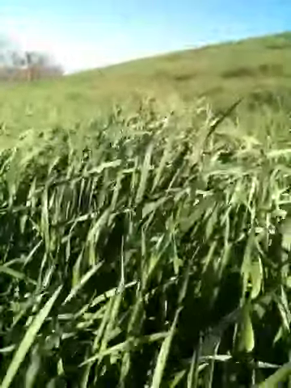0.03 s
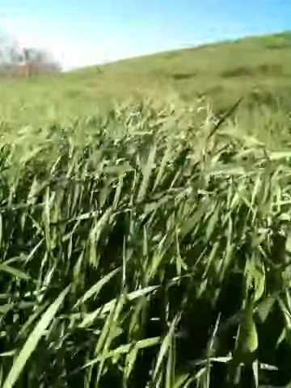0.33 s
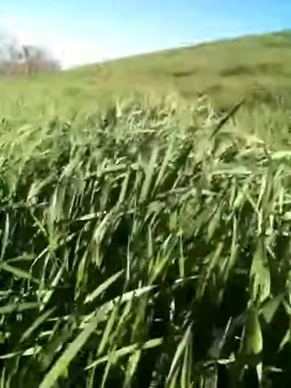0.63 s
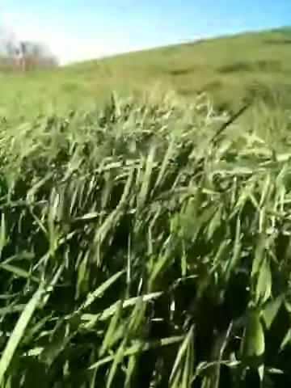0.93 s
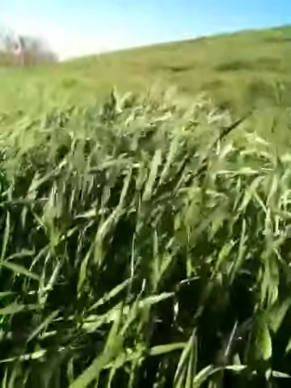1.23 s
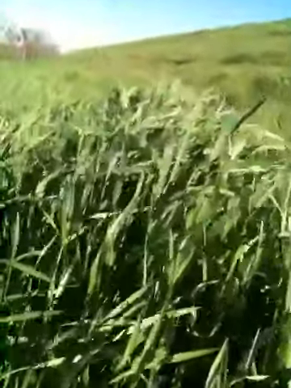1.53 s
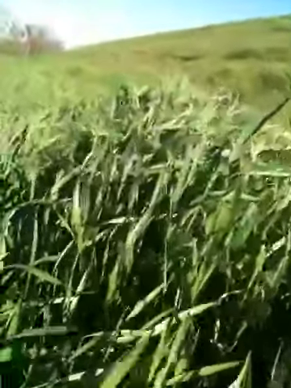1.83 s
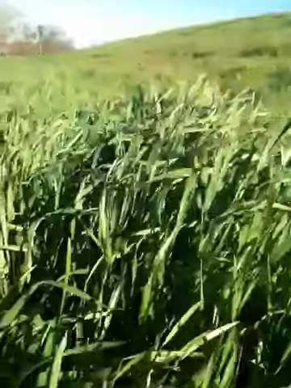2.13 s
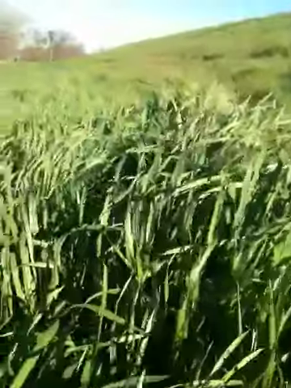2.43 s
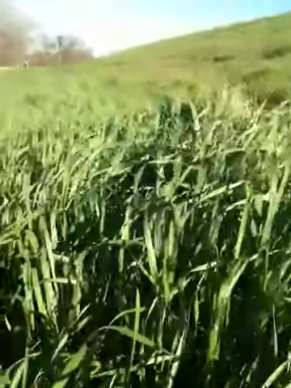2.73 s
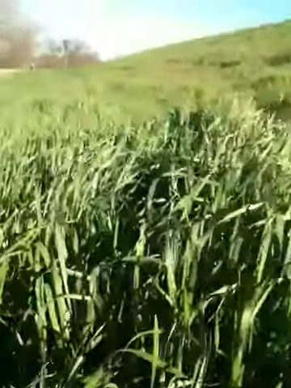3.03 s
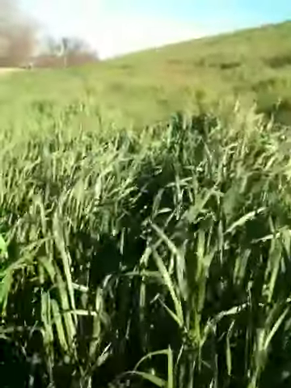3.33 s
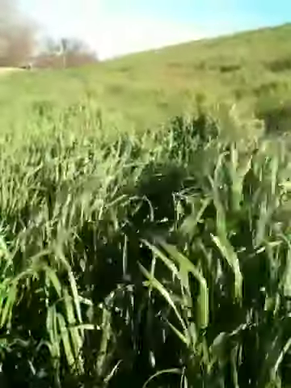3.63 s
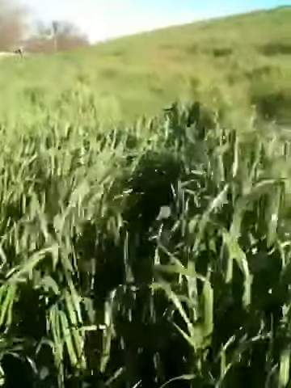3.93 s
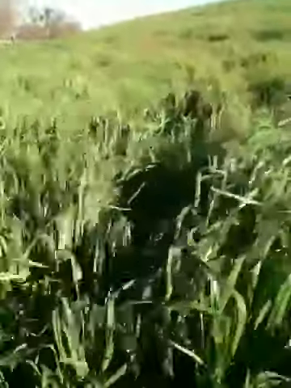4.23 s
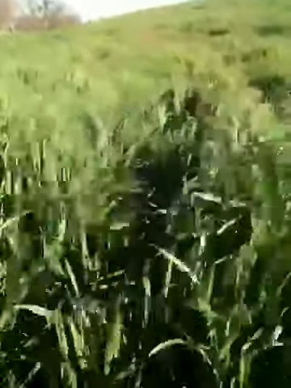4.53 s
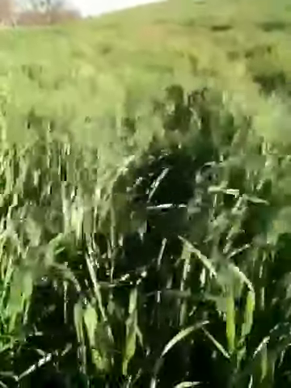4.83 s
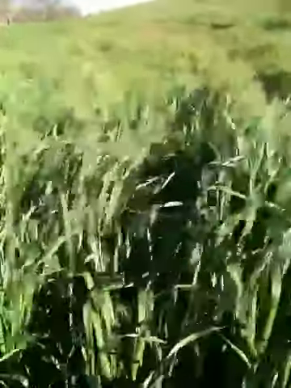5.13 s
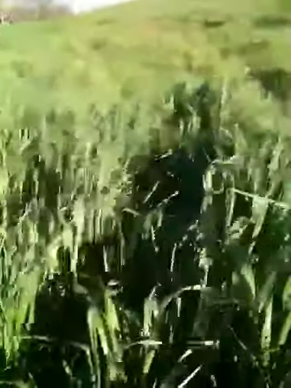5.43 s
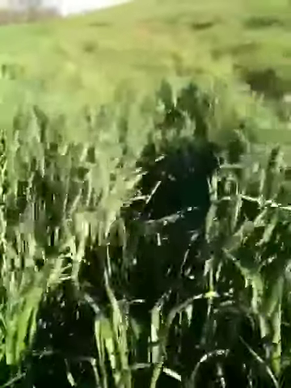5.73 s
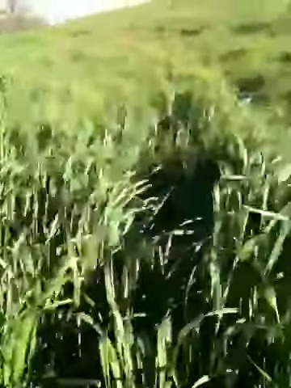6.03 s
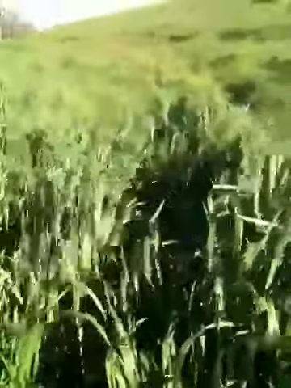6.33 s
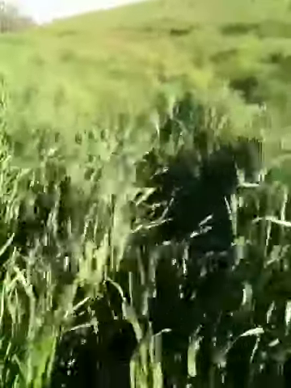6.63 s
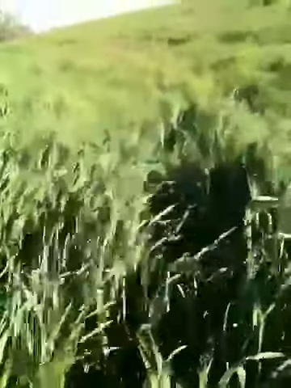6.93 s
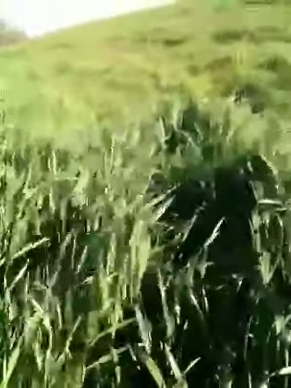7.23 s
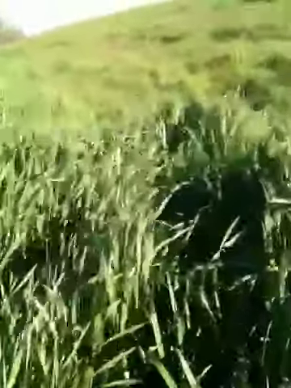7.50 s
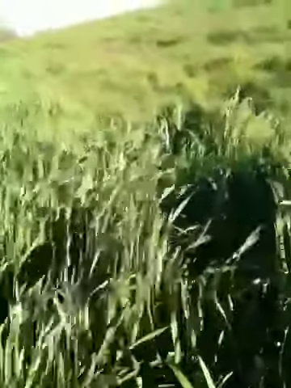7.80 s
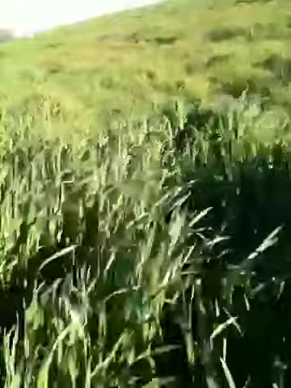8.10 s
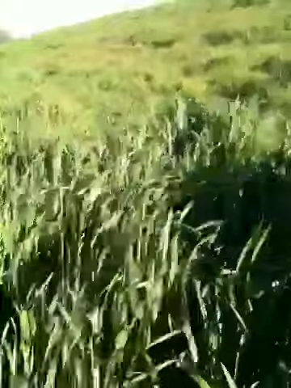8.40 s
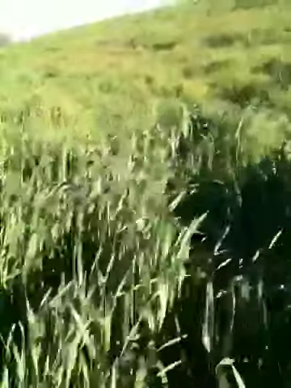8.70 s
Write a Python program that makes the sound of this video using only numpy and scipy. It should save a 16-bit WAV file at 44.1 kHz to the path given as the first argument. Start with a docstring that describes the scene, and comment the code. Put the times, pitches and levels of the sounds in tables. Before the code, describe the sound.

A quiet breeze rustles tall grass close to the microphone, with small, bright flicks of blades and a soft rush of wind far across the hill. Then wind starts hitting the microphone in uneven, low rumbles, much louder than the grass. After a single, barely audible peep, the buffeting peaks with thumps and brief pops and carries on to the end.

```python
"""Wind on an open hillside, from a small microphone held just above tall grass.
At first the blades hiss and tick as the breeze swells, over a soft, far roar of moving air.
From four seconds on, gusts reach the microphone and buffet it with low, fluttering thumps.
Just after seven seconds comes one faint peep; then the strongest gusts snap past the port."""
import sys
import numpy as np
from scipy import signal
from scipy.fft import rfft, irfft, next_fast_len
from scipy.io import wavfile
from scipy.ndimage import uniform_filter1d

SR = 44100
rng = np.random.default_rng(int(sys.argv[2]) if len(sys.argv) > 2 else 0)


def wrap_up_sound(samples):
    """Save the sound to the file named by the first command line argument, as 16-bit audio."""
    columns = np.atleast_2d(samples).T
    # keep every value between -1 and 1, then stretch to whole-number steps
    tamed = np.clip(columns, -1, 1)
    steps = np.round(tamed * 32767).astype(np.int16)
    wavfile.write(sys.argv[1], SR, steps)


N = 390726
TIME = np.arange(N) / SR


def gain_of(db):
    """Decibels to amplitude."""
    return 10 ** (np.asarray(db) / 20)


def unit_rms(x):
    """Scales to rms 1."""
    return x / np.sqrt(np.mean(x ** 2) + 1e-20)


def spectrum_gain(spectrum, hz):
    """A spectrum's amplitude at hz, its points joined on a log axis."""
    f, db = np.transpose(spectrum)
    return gain_of(np.interp(np.log(hz + 1), np.log(f + 1), db))


def follow(curve):
    """A curve's value at every sample."""
    return np.interp(TIME, *np.transpose(curve))


def add_centred(mix, s, sound):
    """Mixes a sound in, centred on the time s where there is room before it."""
    part = mix[max(round(s * SR) - len(sound) // 2, 0):][:len(sound)]
    part += sound[:len(part)]


def eddy_gain(hz, rolloff_hz):
    """The smallest eddies set a frequency above which the pressure dies away steeply."""
    return 1 / np.sqrt(1 + (hz / rolloff_hz) ** 6)


def coloured(x, spectrum, rolloff_hz=np.inf):
    """Gives x a spectrum, with an optional steep roll-off; rms 1."""
    size = next_fast_len(len(x))
    hz = np.fft.rfftfreq(size, 1 / SR)
    shaped = rfft(x, size) * spectrum_gain(spectrum, hz) * eddy_gain(hz, rolloff_hz)
    return unit_rms(irfft(shaped, size)[:len(x)])


def wander(rate_hz):
    """A random drift of rms 1, with motion up to about rate_hz."""
    size = next_fast_len(N)
    hz = np.fft.rfftfreq(size, 1 / SR)
    slow = rfft(rng.standard_normal(size)) / (1 + (hz / rate_hz) ** 4)
    return unit_rms(irfft(slow, size)[:N])


def impulses(per_s, spread_db):
    """A random train of tiny impulses, a few much stronger than the rest."""
    strength = gain_of(spread_db * np.minimum(rng.exponential(1, N), 5))
    return unit_rms(strength * rng.choice([-1., 1.], N) * (rng.random(N) < per_s / SR))


def whine(lines_hz=(14970, 15030), level_db=-87.5):
    """A very faint electrical whine behind everything: two close, high lines."""
    return gain_of(level_db) * sum(np.sin(2 * np.pi * hz * TIME) for hz in lines_hz)


# the distant roar's course: t/s, level/dB
ROAR_LEVEL = [(0, -60.5), (2.5, -59), (6, -59.5), (8.86, -59)]
# spectra of the roar and the rumble under it: f/Hz, relative level/dB
ROAR_SPECTRUM = [(100, -43), (330, -10.5), (480, -1.5), (620, -0.5), (780, -1), (1000, -5.5), (1300, -10.5),
                 (1800, -16.5), (2500, -27), (5000, -45)]
RUMBLE_SPECTRUM = [(20, -36), (40, -50), (62, -20), (90, -9.5), (125, 0.5), (160, 2.5), (225, -0.5),
                   (300, -10), (420, -18), (900, -50)]

def far_air(rumble_db=-57.0):
    """Far off, wind roars softly over the whole hill, above a steady low rumble."""
    roar = coloured(rng.standard_normal(N), ROAR_SPECTRUM)
    roar *= gain_of(follow(ROAR_LEVEL) + 0.23 * wander(rate_hz=4.7))
    rumble = coloured(rng.standard_normal(N), RUMBLE_SPECTRUM)
    rumble *= gain_of(rumble_db + 0.6 * wander(rate_hz=6.7))
    return roar + rumble


def peep(at_s=7.144, pitch_hz=3230, level_db=-57.5, length_s=0.016):
    """One thin, slightly unsteady note among the grass."""
    turns = np.cumsum(pitch_hz * (1 + 0.008 * wander(rate_hz=120))) / SR
    envelope = np.exp(-2 * ((TIME - at_s) / length_s) ** 2)
    return gain_of(level_db) * envelope * np.sin(2 * np.pi * turns)


def tufts(x, depth_db):
    """As different tufts move, patches a few hundred Hz wide swell and fade."""
    z = signal.stft(x, nperseg=512, noverlap=384)[2]
    patches = uniform_filter1d(rng.standard_normal(z.shape), size=9, axis=0)
    patches = unit_rms(uniform_filter1d(patches, size=26, axis=1))
    return unit_rms(signal.istft(z * gain_of(depth_db * patches), nperseg=512, noverlap=384)[1][:N])


# the breeze in the grass around the microphone: t/s, rustle level/dB
BREEZE_LEVEL = [(0.06, -66.5), (1.45, -64), (2.65, -60), (3.69, -61.5), (3.84, -60.5), (3.96, -61.5),
                (4.11, -58.5), (4.4, -59.5), (4.45, -58), (4.6, -61), (5.65, -63), (5.79, -61.5),
                (7.04, -61.5), (7.33, -58.5), (7.72, -61), (8.6, -61), (8.77, -63.5), (8.82, -62)]
# spectra of the far blades and the near tips: f/Hz, relative level/dB
HISS_SPECTRUM = [(1200, -12), (2000, -5), (2450, -5), (2950, 0), (3400, 1.5), (4050, 1), (4550, 2.5),
                 (5300, -1), (6000, -5.5), (6900, -8.5), (8000, -11.5), (11000, -22), (15700, -14.5)]
FIZZ_SPECTRUM = [(3500, -22.5), (5500, -4.5), (6600, -0.5), (7600, -1.5), (8800, 2), (10000, -1.5),
                 (11200, -5), (13000, -10.5), (15700, -13)]

def grass(usual_breeze_db=-62, hiss_db=-63.5, fizz_db=-66):
    """Far blades merge into a hiss; near tips add a grainy fizz that grows faster with the breeze."""
    swell_db = follow(BREEZE_LEVEL) - usual_breeze_db
    hiss = rng.standard_normal(N) + 0.5 * impulses(per_s=1800, spread_db=4.0)
    fizz = rng.standard_normal(N) + 0.61 * impulses(per_s=1300, spread_db=3.0)
    hiss = tufts(coloured(hiss, HISS_SPECTRUM), depth_db=0.52)
    hiss *= gain_of(hiss_db + 0.95 * swell_db + 0.47 * wander(rate_hz=21))
    fizz = tufts(coloured(fizz, FIZZ_SPECTRUM), depth_db=0.9)
    fizz *= gain_of(fizz_db + 1.63 * swell_db + 0.53 * wander(rate_hz=17))
    return hiss + fizz


def reflection(x, notch_hz=4180, slide_hz_per_s=103, width_hz=190, shoulder_hz=1300, settle_s=1.8):
    """A reflection cuts a notch with raised shoulders; it sinks and eases as the microphone turns."""
    first_db, later_db, shoulder_db = 5, 2.3, 2.0
    hz, t, z = signal.stft(x, SR, nperseg=1024)
    offset_hz = hz[:, None] - (notch_hz - slide_hz_per_s * t)
    fading = np.exp(-t / settle_s)
    dip_db = (later_db + (first_db - later_db) * fading) * np.exp(-(offset_hz / width_hz) ** 2)
    lift_db = shoulder_db * fading * np.exp(-(offset_hz / shoulder_hz) ** 2)
    return signal.istft(z * gain_of(lift_db - dip_db), nperseg=1024)[1][:N]


# blades sliding along each other: t/s, level/dB, length/s, centre f/Hz
BLADE_SWISHES = [(.8, -73, 0.064, 10050), (2.032, -75, 0.11, 10050), (2.386, -67, .12, 9800),
                 (7.73, -68, 0.11, 9900)]

def swishes(width_hz=450):
    """A long stroke of leaf on leaf: a narrow, grainy band that swells and fades."""
    out, t = np.zeros(N), np.arange(-8192, 8192) / SR
    skirt = [(-2.5, -40), (-1, -6), (0, 0), (1, -6), (2.5, -40)]  # offset/widths, level/dB
    for s, db, length, hz in BLADE_SWISHES:
        band = [(hz + offset * width_hz, band_db) for offset, band_db in skirt]
        stroke = coloured(impulses(per_s=2300, spread_db=4.0)[:len(t)], band)
        add_centred(out, s, gain_of(db) * stroke * np.exp(-2 * (t / length) ** 2))
    return out


# blades flicking close to the microphone: t/s, peak level/dB
BLADE_FLICKS = [(0.0667, -56), (.438, -57), (1.0071, -50), (1.496, -52), (1.932, -51), (2.4014, -48),
                (2.9677, -48), (3.2574, -52), (3.444, -47.5), (3.8048, -46.5), (5.4321, -49), (6.1524, -47),
                (6.5136, -46), (6.5385, -47.5), (7.815, -45), (8.3828, -54)]
# spectrum of one flick: f/Hz, relative level/dB
FLICK_SPECTRUM = [(2000, -28), (4000, 2), (6000, -1.5), (8000, -1), (9700, 2.5), (11500, -9), (15500, -11)]

def flicks(decay_s=0.005):
    """Close by, one blade slips off another: a bright scratch of a few milliseconds."""
    out, t = np.zeros(N), np.arange(-2048, 2048) / SR
    envelope = (t >= 0) * np.exp(-abs(t) / decay_s)
    for s, db in BLADE_FLICKS:
        scratch = coloured(rng.standard_normal(len(t)) * envelope, FLICK_SPECTRUM)
        add_centred(out, s, gain_of(db) * scratch / abs(scratch).max())
    return out


# gusts that reach the microphone: arrival t/s, hold/s, level/dB, eddy roll-off f/Hz
MIC_GUSTS = [(4.068, 0.032, -43, 290), (4.174, 0.15, -42, 394), (4.385, .12, -55, 310),
             (4.988, 0.028, -46.5, 350), (5.13, 0.091, -47, 363), (5.478, 0.013, -44.5, 265),
             (5.707, 0.024, -48, 297), (5.878, 0.78, -46.5, 380), (6.808, 0.045, -43, 377),
             (7.201, 0.1, -45.5, 320), (7.329, 0.053, -34, 810), (7.4, 0.091, -32, 550),
             (7.614, 0.45, -38, 540), (8.13, 0.56, -44, 466), (8.743, .13, -37.5, 420)]

def gusts(t, build_db_per_s=376, creep_db_per_s=1, release_db_per_s=155):
    """Level and roll-off of the air at the microphone: gusts add up, the strongest sets the colour."""
    power, weighted_hz = 0, 0
    for s, hold, db, rolloff_hz in MIC_GUSTS:
        early, held, late = np.maximum(s - t, 0), np.clip(t - s, 0, hold), np.maximum(t - s - hold, 0)
        gust_db = db - build_db_per_s * early + creep_db_per_s * held - release_db_per_s * late
        gust_power = gain_of(gust_db) ** 2 + 1e-14
        power += gust_power
        weighted_hz += gust_power * rolloff_hz
    return 10 * np.log10(power), weighted_hz / power


# spectrum of wind right on the microphone port: f/Hz, relative level/dB
PORT_SPECTRUM = [(15, -42), (40, -52), (62, -19.5), (95, -10), (130, -1.5), (170, 1.5), (230, -1),
                 (300, -5), (500, -8.5), (800, -9), (1500, -16.5), (2500, -15)]

def turbulence(trim_db=-0.16, flutter_db=3.1, steadier_above_db=-45):
    """Pressure flutters at the port; faster air carries smaller eddies and sounds brighter."""
    pushes = rng.standard_normal(N) + 0.9 * impulses(per_s=260, spread_db=1.5)
    hz, t, z = signal.stft(pushes, SR, nperseg=2048, noverlap=1536)
    _, rolloff_hz = gusts(t)
    colour = spectrum_gain(PORT_SPECTRUM, hz)[:, None] * eddy_gain(hz[:, None], rolloff_hz)
    colour /= np.linalg.norm(colour, axis=0)
    flow = signal.istft(z * colour, nperseg=2048, noverlap=1536)[1][:N]
    gust_db, _ = gusts(TIME)
    # the stronger a gust blows, the steadier its roar
    depth_db = flutter_db - 0.13 * np.maximum(gust_db - steadier_above_db, 0)
    flutter = gain_of(depth_db * wander(rate_hz=36))
    return unit_rms(flow * flutter) * gain_of(gust_db + trim_db)


# the strongest single eddies to strike the microphone: t/s, nominal level/dB, nominal length/s
EDDY_BUFFETS = [(4.087, -30, 0.0075), (4.159, -29, 0.018), (4.196, -29.5, 0.019), (4.235, -34, 0.017),
                (4.267, -33.5, 0.0065), (5.15, -38.5, .012), (5.511, -38, 0.0087), (5.74, -43, 0.0076),
                (5.985, -36.5, 0.021), (6.156, -36, 0.032), (6.252, -44, 0.044), (6.553, -39.5, 0.021),
                (6.798, -29.5, 0.0043), (6.83, -33, 0.011), (7.276, -34.5, .005), (7.309, -24, .012),
                (7.688, -32.5, 0.013), (7.785, -26, 0.011), (7.912, -35, 0.014), (8.035, -36, 0.017),
                (8.163, -34.5, 0.01), (8.206, -30.5, 0.0068), (8.261, -39, 0.0098), (8.303, -33, .012),
                (8.364, -37, 0.007), (8.412, -32.5, 0.022), (8.575, -33.5, 0.024), (8.641, -37.5, 0.011),
                (8.801, -29, 0.0087)]

def buffets(trim_db=-0.9, stretch=0.99, low_cut_hz=115):
    """Each eddy gives the port a short, irregular shove, coloured like its gust, less the deep bass."""
    out, t = np.zeros(N), np.arange(-4096, 4096) / SR
    low_cut = signal.butter(2, low_cut_hz, "highpass", fs=SR)
    for s, db, length in EDDY_BUFFETS:
        _, rolloff_hz = gusts(s)
        shove = rng.standard_normal(len(t)) * np.exp(-2 * (t / (stretch * length)) ** 2)
        thump = coloured(signal.lfilter(*low_cut, shove), PORT_SPECTRUM, rolloff_hz)
        thump *= np.sqrt(length * SR / len(t))  # a longer eddy carries more energy
        add_centred(out, s, gain_of(db + trim_db) * thump)
    return out


# the fastest eddies, right at the port: t/s, peak level/dB, passing time/s
VORTEX_SNAPS = [(7.305, -25, 0.00054), (7.312, -30, 0.00075), (7.7822, -21, 0.00045),
                (8.026, -21.5, 0.00074), (8.207, -31, 0.00061), (8.302, -25.5, 0.00044)]

def snaps():
    """A tight vortex crosses the port: a quick suck between two small pushes."""
    out, t = np.zeros(N), np.arange(-512, 512) / SR
    for s, db, passing_s in VORTEX_SNAPS:
        swing = (2 * np.tanh(t / passing_s) ** 2 - 1) / np.cosh(t / passing_s)
        add_centred(out, s, gain_of(db) * swing)
    return out


def scene():
    """In mono: grass close below, air far off, and gusts right on the microphone."""
    hillside = reflection(grass()) + flicks() + swishes() + far_air() + peep()
    return (hillside + turbulence() + buffets() + snaps() + whine())[None]


def record(dry, edge_hz=15750):
    """The recorder's steep band limit."""
    lowpass = signal.firwin(1023, edge_hz, window=("kaiser", 9), fs=SR)
    return signal.oaconvolve(dry, lowpass[None], "same")


dry = scene()
out = record(dry)
wrap_up_sound(out)
```